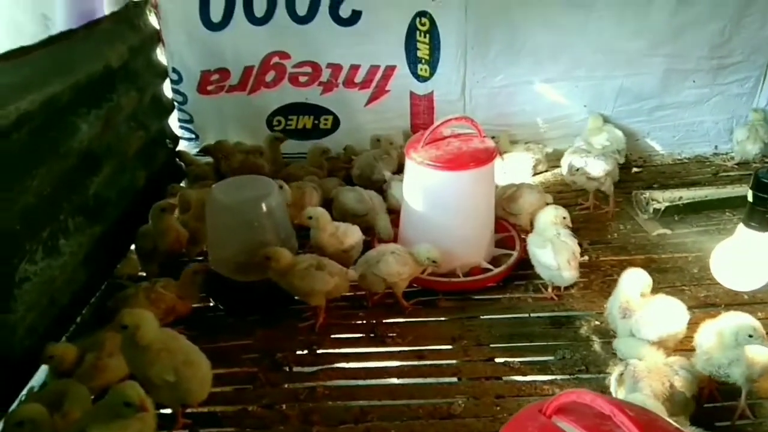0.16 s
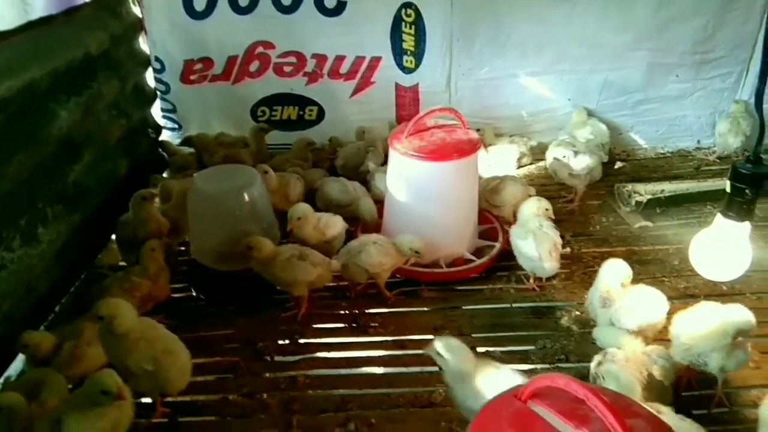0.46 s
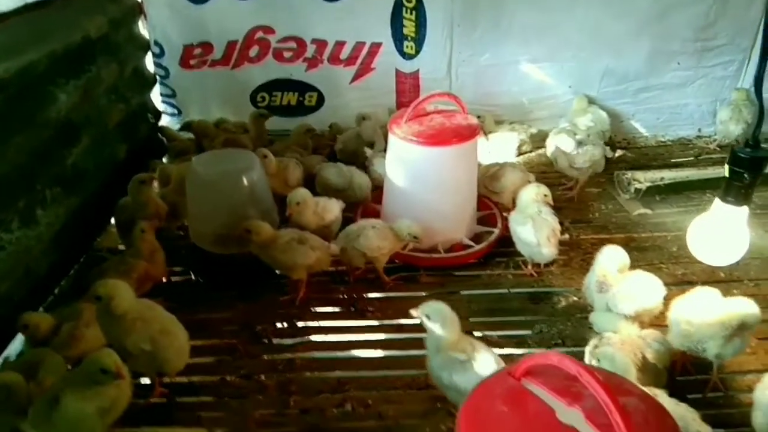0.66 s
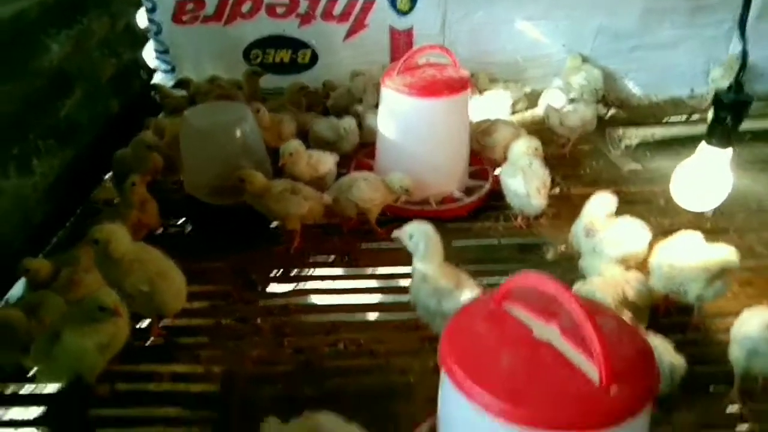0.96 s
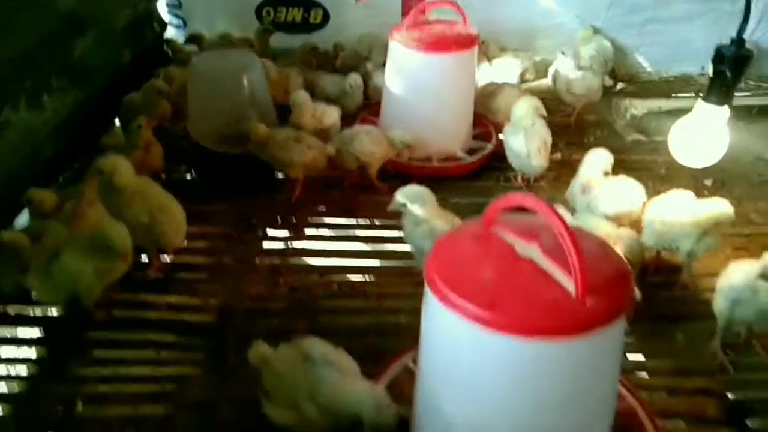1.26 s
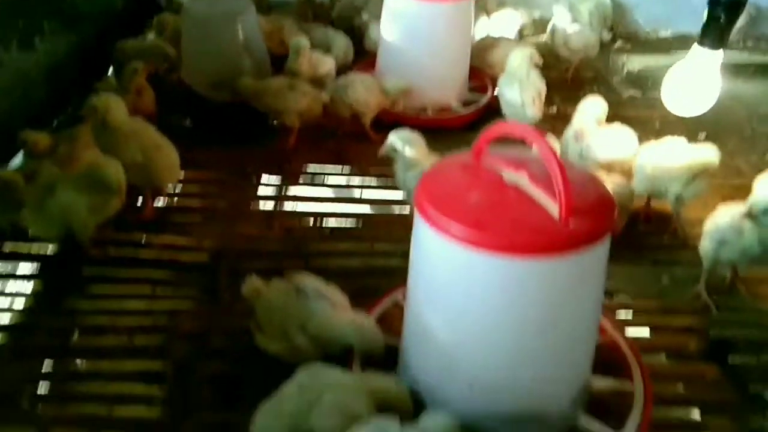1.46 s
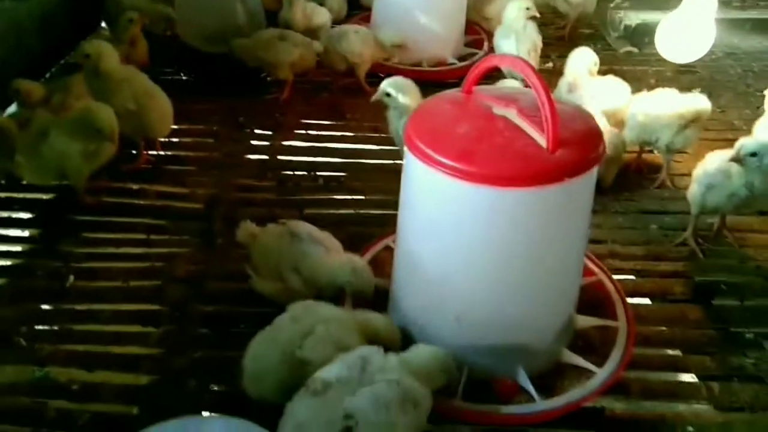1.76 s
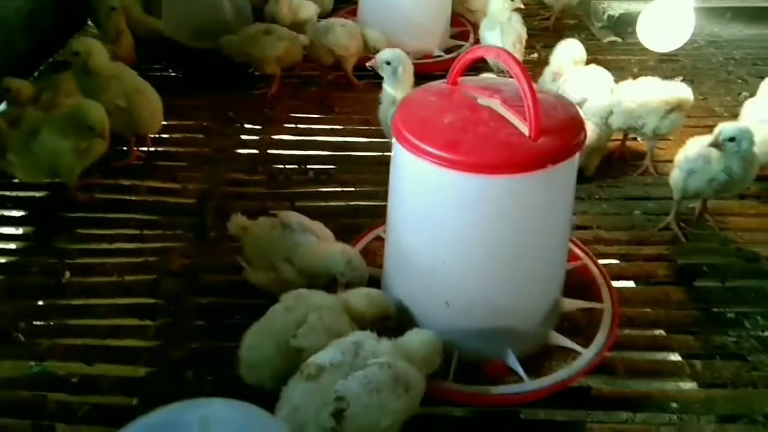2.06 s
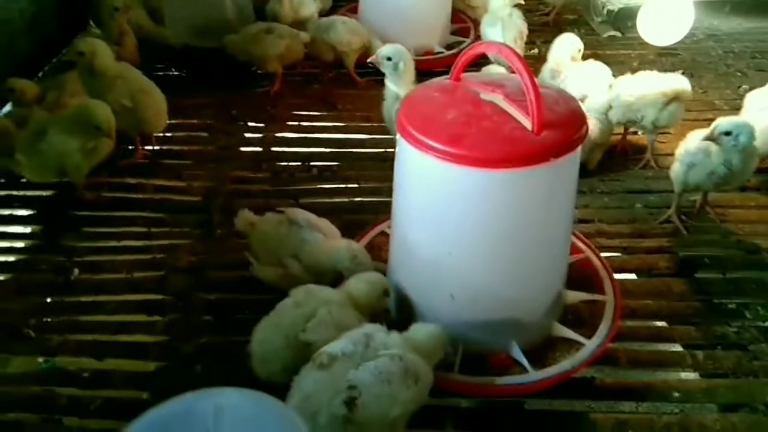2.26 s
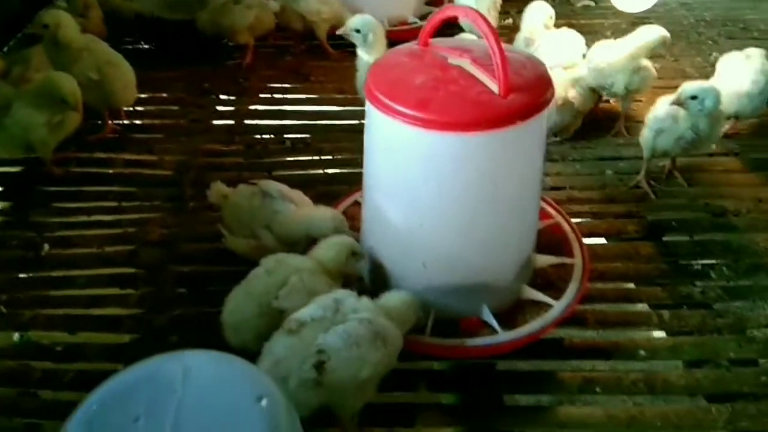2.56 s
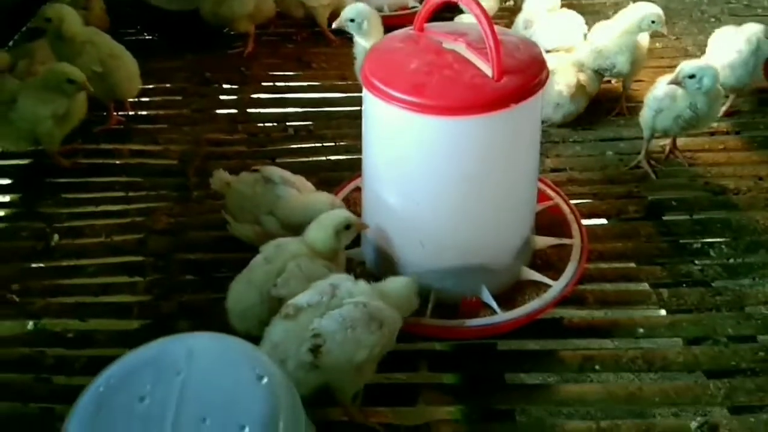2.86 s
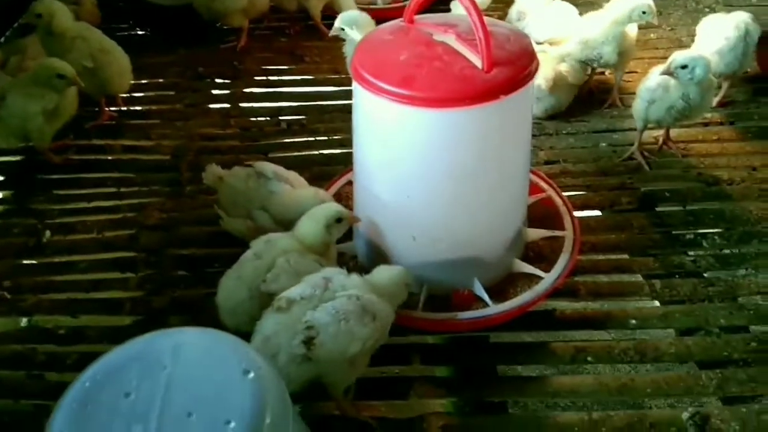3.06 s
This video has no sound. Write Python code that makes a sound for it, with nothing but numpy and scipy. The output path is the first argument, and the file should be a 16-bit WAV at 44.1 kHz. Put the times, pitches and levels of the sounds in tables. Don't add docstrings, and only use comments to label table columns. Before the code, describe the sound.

A flock of chicks chirps continuously close to a handheld microphone, with light taps on slats, tiny pecks and a low rumble. A shrill insect drone hisses steadily behind, and the whole scene fades smoothly.

```python
import sys
import numpy as np
from scipy import signal
from scipy.fft import rfft, irfft
from scipy.io import wavfile
from scipy.ndimage import uniform_filter1d

SR = 44100
rng = np.random.default_rng(int(sys.argv[2]) if len(sys.argv) > 2 else 0)


def gain_from_db(level_db):
    decades = np.asarray(level_db, float) / 20
    return 10 ** decades


def wrap_up_sound(samples):
    columns = np.atleast_2d(samples).T
    tamed = np.clip(columns, -1, 1)
    steps = np.round(tamed * 32767).astype(np.int16)
    wavfile.write(sys.argv[1], SR, steps)


N = 141120
T = np.arange(N) / SR


def table(rows, x, log=False):
    a = np.array(rows, float)
    if log:
        return np.interp(np.log(x), np.log(a[:, 0]), a[:, 1])
    return np.interp(x, a[:, 0], a[:, 1])


def level(x, db):
    return x * gain_from_db(db) / np.sqrt(np.mean(x ** 2))


def walk(rate):
    k = int(SR / rate)
    stairs = np.repeat(rng.standard_normal(N // k + 1), k)
    smooth = uniform_filter1d(uniform_filter1d(stairs, k), k)
    return level(smooth[:N], 0)


def coloured(rows):
    hz = np.arange(1, N // 2 + 2) * SR / N
    return irfft(rfft(rng.standard_normal(N)) * gain_from_db(table(rows, hz, True)), N)


def band(x, hz, width_hz):
    return signal.lfilter(*signal.iirpeak(hz, hz / width_hz, fs=SR), x)


def fade_db(t):
    # [t/s, level/dB]
    fade = [(0, 0.44), (.5, -0.25), (1.5, -6), (2.0, -9.5), (2.9, -19), (3.2, -23)]
    return table(fade, t)


def yard():
    # [f/Hz, level per Hz/dB]
    rumble = [(38, -20), (60, 3), (214, 1), (716, -8.5), (2000, -25), (4000, -39)]
    # [f/Hz, level per Hz/dB]
    air_rows = [(2000, -10), (4500, -9.5), (12000, -28), (15000, -27.5)]
    # [f/Hz, width/Hz, level/dB]
    hum_rows = [
        (118, 50, -68),
        (220, 16, -65),
    ]
    # [t/s, level/dB]
    bustle = [(0, 1), (.5, -1), (1.2, 1), (1.6, -3.5), (2.1, 0.5), (2.7, 4), (3.2, 10.5)]
    low = level(coloured(rumble) * gain_from_db(1.54 * walk(4.93) + table(bustle, T)), -58)
    hum = 0
    for hz, width, db in hum_rows:
        hum = hum + level(band(rng.standard_normal(N), hz, width), db) * gain_from_db(0.63 * walk(4.37))
    air = level(coloured([(1000, -12.5)] + air_rows) * gain_from_db(2.2 * walk(4.55)), -55.5)
    flock_hz, flock_width_hz = 3150, 610
    flock = band(rng.standard_normal(N), flock_hz, flock_width_hz)
    flock = band(flock, flock_hz, flock_width_hz)
    return low + hum + air + level(flock * gain_from_db(2 * walk(9.3)), -63)


def cicada(rate):
    drum = {13: -20, 14: -15, 15: 0, 16: -10, 17: -4, 18: -14, 19: -15, 20: -22, 21: -27}
    phase = 2 * np.pi * (np.cumsum(rate) / SR + rng.random())
    return level(sum(gain_from_db(db) * np.sin(k * phase) for k, db in drum.items()), 0)


def chorus():
    # [start f/Hz, end f/Hz]
    rates = [(455.1, 455.1), (435.4, 440.4), (464.3, 461.6), (473.8, 474.8), (426.3, 433.9)]
    # [start level/dB, end level/dB]
    levels = [
        (-43, -42),
        (-47.5, -29.5),
        (-32, -54),
        (-50, -49),
        (-48.5, -42.5),
    ]
    # [f/Hz, level per Hz/dB]
    hiss_rows = [(4600, -40.5), (5350, -22), (5600, -15.5), (6280, -12.5), (6420, 0), (7700, -5.5),
                 (9400, -20.5), (12000, -42.5)]
    u = T / T[-1]
    near = 0
    for (rate0, rate1), (db0, db1) in zip(rates, levels):
        rate = (rate0 + (rate1 - rate0) * u ** 2) * (1 + 0.0006 * walk(25.34))
        near = near + cicada(rate) * gain_from_db(db0 + (db1 - db0) * u + 3 * walk(7.62))
    swarm_hz = np.r_[rng.normal(456, 5, size=8), rng.normal(434, 4, size=5), rng.uniform(462, 480, size=5)]
    swarm = 0
    for hz in swarm_hz:
        wobble = 0.0015 * (walk(40) + 2 * walk(1))
        swarm = swarm + cicada(hz * (1 + wobble)) * gain_from_db(4 * walk(2.5))
    hiss = level(coloured(hiss_rows), -35.5) * gain_from_db(-3 * u ** 2)
    return near + level(swarm, -33) + hiss


def bumps():
    # [t/s, length/s, f/Hz, level/dB]
    rows = [
        (0.844, 0.1, 120, -54),
        (2.562, 0.035, 233, -44),
        (2.601, 0.023, 220, -45),
        (2.788, 0.071, 153, -50.5),
    ]
    out = np.zeros(N)
    for start, length, hz, db in rows:
        swell = np.exp(-(2 * (T - start) / length - 1) ** 2 * 2)
        out += level(band(rng.standard_normal(N), hz, 23.0), db) * swell
    return out


def steps():
    # [t/s, peak level/dB, f/Hz]
    rows = [(0.07, -42, 348), (0.098, -47, 380), (0.136, -48, 600), (0.415, -39.5, 400), (0.776, -46, 506),
            (0.833, -45.5, 764), (1.131, -45, 606), (1.331, -50.5, 900), (1.621, -52, 665),
            (1.686, -55, 490), (1.808, -52, 484), (1.968, -55, 497), (2.022, -57.5, 710), (2.237, -54, 515),
            (2.293, -55.5, 516), (2.35, -59.5, 540), (2.464, -58.5, 650), (2.664, -65, 890),
            (2.71, -62.5, 594), (2.955, -68, 604), (3.125, -57.5, 650)]
    t60_s, scuff_db, step_db = 0.12, -3.5, -4.5
    out, t = np.zeros(N + SR), T[:SR // 4]
    for start, db, hz in rows:
        noise = rng.standard_normal(len(t))
        slat = level(band(noise, hz, 184.0), 0)
        scuff = gain_from_db(scuff_db) * level(band(noise, 490.0, 2400.0), 0)
        env = np.minimum(t / 0.0017, 1) * gain_from_db(db + step_db - fade_db(start) - 60 * t / t60_s)
        i = int(start * SR)
        out[i:i + len(t)] += (slat + scuff) * env
    return out[:N]


def pecks():
    # [t/s, peak level/dB]
    rows = [
        (0.834, -60),
        (1.0093, -57.5),
        (1.7475, -65.5),
        (1.8288, -57),
        (2, -59),
        (2.0857, -61.5),
        (2.5192, -61.5),
    ]
    t60_s, peck_db = 0.081, 9.5
    out, t = np.zeros(N + SR), T[:SR // 4]
    bright = signal.butter(2, [1100, 5500], "band", fs=SR)
    for start, db in rows:
        tick = level(signal.lfilter(*bright, rng.standard_normal(len(t))), 0)
        i = int(start * SR)
        out[i:i + len(t)] += tick * gain_from_db(db + peck_db - fade_db(start) - 60 * t / t60_s)
    return out[:N]


def whistles(rows, bend, flutter, waver):
    lead_s, attack_s, release_s = 0.013, 0.023, 0.012
    scoop, waver_hz, overtone_db, whistle_db = 5.85, 24, -24, 1.5
    throat_hz, throat_db_per_oct = 3500, -24.5
    out = np.zeros(N)
    for k, (start, length, hz0, hz1, db) in enumerate(rows):
        t = T - start
        on = (t > -lead_s) & (t < length + lead_s / 2)
        t = t[on]
        own = (np.flatnonzero(on) + 9973 * k + int(20000 * bend)) % N
        glide = np.clip(t / length, 0, None) ** bend
        lead_in = scoop * (bend - 1) * np.clip(-t / length, 0, None) ** 2
        hz = hz0 + (hz1 - hz0) * (glide + lead_in) + waver_hz * waver[own]
        phase = 2 * np.pi * np.cumsum(hz) / SR
        rise, fall = (t + lead_s) / attack_s, (length + lead_s / 2 - t) / release_s
        env = np.sin(np.clip(np.minimum(rise, fall), 0, 1) * np.pi / 2) ** 2
        throat_db = throat_db_per_oct * np.clip(np.log2(hz / throat_hz), 0, None)
        env = env * gain_from_db(db + whistle_db + throat_db) * flutter[own]
        out[on] += env * np.sqrt(2) * (np.sin(phase) + gain_from_db(overtone_db) * np.sin(2 * phase))
    return out


def hoots(flutter, waver):
    first_s, gap_s, length_s, hz, db = 3, 0.135, 0.04, 650, -60.5
    rows = [(first_s + k * gap_s, length_s, hz, hz, db) for k in range(5)]
    return whistles(rows, 1.0, flutter, waver)


def chicks(flutter, waver):
    # [t/s, length/s, start f/Hz, end f/Hz, level/dB]
    arches = [(0.096, 0.067, 3298, 2739, -42.5), (0.339, 0.042, 3570, 2590, -38),
              (0.588, 0.053, 3790, 2680, -41.5), (0.605, 0.02, 2620, 2458, -35),
              (0.858, 0.042, 3593, 2960, -46), (0.874, 0.025, 2864, 2497, -42.5),
              (0.944, 0.056, 3353, 3165, -43), (1.392, 0.051, 3860, 3210, -44),
              (1.413, 0.026, 4600, 3400, -42.5), (1.445, 0.044, 3590, 2650, -44),
              (1.564, 0.052, 3820, 3270, -45), (1.687, 0.037, 3130, 2550, -45),
              (2.075, 0.077, 3430, 2928, -39.5), (2.08, 0.036, 3210, 2590, -43),
              (2.158, 0.016, 2645, 2315, -39.5), (2.285, 0.038, 4820, 3491, -44),
              (2.335, 0.042, 3130, 2446, -32.5), (2.41, 0.059, 3860, 3104, -39.5),
              (2.603, 0.068, 3854, 3086, -40), (2.738, 0.045, 3430, 2630, -38.5),
              (2.771, 0.079, 3880, 2670, -37.5), (2.846, 0.0285, 3625, 3260, -33),
              (2.975, 0.041, 3766, 2790, -35), (2.94, .045, 3310, 2477, -34), (.56, .04, 3500, 3130, -49),
              (2.995, 0.041, 3640, 2590, -31.5), (3.133, 0.043, 3870, 2640, -35.5)]
    # [t/s, length/s, start f/Hz, end f/Hz, level/dB]
    slides = [(0.19, 0.016, 4170, 3450, -45), (0.194, 0.034, 3250, 2673, -41),
              (0.207, 0.05, 2770, 2627, -32.5), (0.397, 0.032, 3950, 3650, -50),
              (0.417, 0.035, 4050, 3207, -36), (.425, 0.042, 3850, 3050, -41),
              (0.455, 0.025, 3189, 2180, -38.5), (0.524, 0.03, 3420, 2850, -32.5),
              (0.718, 0.056, 3510, 2550, -51.0), (0.997, 0.094, 2970, 2698, -33.5),
              (1.082, 0.021, 3770, 2970, -38.5), (1.205, 0.044, 4430, 3240, -43.5),
              (1.243, 0.051, 3330, 2853, -50.5), (1.799, 0.049, 3000, 2673, -41.5),
              (1.937, 0.03, 2712, 2500, -48.5), (2.024, 0.052, 4550, 3530, -40),
              (2.285, 0.022, 3000, 2620, -45), (2.319, 0.0258, 3579, 3030, -35.5),
              (2.662, 0.032, 3367, 3150, -33.5), (2.692, 0.019, 3096, 2520, -35.5),
              (2.712, 0.053, 3120, 2880, -35), (2.803, 0.027, 2728, 2224, -33),
              (2.865, 0.031, 3215, 2513, -31), (2.745, 0.029, 2764, 2410, -42),
              (2.948, 0.045, 4040, 2790, -35), (3.122, 0.042, 3255, 2450, -34)]
    # [t/s, length/s, start f/Hz, end f/Hz, level/dB]
    held = [(0, 0.01, 2400, 2300, -42), (.005, 0.033, 2800, 2820, -52.5), (0.157, 0.067, 2800, 2735, -35),
            (.212, 0.048, 3460, 2880, -39), (0.322, 0.051, 1800, 1380, -54.5),
            (0.475, 0.045, 2985, 3025, -38.5), (.555, 0.052, 2840, 2697, -36),
            (0.635, 0.03, 930, 952, -56.5), (0.838, 0.027, 2902, 2840, -35.5),
            (1.085, 0.034, 2654, 2490, -43), (1.497, 0.048, 2363, 2430, -52),
            (1.966, 0.035, 2500, 3290, -42), (2.06, 0.049, 2460, 2500, -50),
            (2.131, 0.028, 2625, 2750, -41), (2.242, 0.09, 3092, 2937, -43),
            (2.368, 0.012, 2515, 2230, -42), (2.325, 0.039, 2380, 2650, -42),
            (2.524, 0.042, 2188, 2222, -44.5), (2.555, 0.049, 3337, 3310, -49),
            (2.712, 0.041, 2497, 2530, -43), (2.775, 0.029, 2690, 2490, -35.5),
            (3.04, 0.038, 3456, 3210, -34), (3.09, 0.043, 3100, 2936, -32.5)]
    # [t/s, length/s, start f/Hz, end f/Hz, level/dB]
    more_peeps = [(0.076, 0.028, 3064, 3255, -48.5), (0.086, 0.078, 3580, 3310, -55.5),
                  (.228, 0.022, 2480, 2260, -44), (0.273, .035, 2543, 2730, -55), (.39, .012, 4800, 4550, -58),
                  (0.438, .03, 3900, 3440, -44), (.47, 0.035, 3450, 3460, -54), (.552, .03, 3570, 4150, -50),
                  (0.641, 0.0094, 2520, 2400, -47), (0.903, 0.079, 4620, 4630, -55),
                  (1.065, .01, 3970, 3850, -57), (1.268, 0.0091, 3600, 3550, -55),
                  (1.542, 0.015, 2490, 3550, -46.5), (1.56, .008, 2850, 2700, -47),
                  (1.683, .022, 3700, 3160, -56), (1.807, 0.022, 4080, 4040, -52),
                  (1.857, 0.023, 2762, 2740, -59), (2.023, 0.028, 3350, 3220, -50),
                  (2.155, 0.063, 3520, 3340, -52.5), (2.38, 0.022, 3350, 3430, -48),
                  (2.828, .02, 3980, 3850, -51), (2.912, 0.021, 3000, 4000, -51), (2.925, .025, 4420, 4250, -52),
                  (2.928, 0.091, 2720, 2290, -50)]
    falling = whistles(arches, 1.6, flutter, waver)
    dropping = whistles(slides, 0.65, flutter, waver)
    return falling + dropping + whistles(held + more_peeps, 1.0, flutter, waver)


def pen_echo(near):
    t60_s, echo_db, shuffle_hz = 0.2, -3.5, 30
    t = T[:SR // 2]
    echo = rng.standard_normal(len(t)) * gain_from_db(-60 * t / t60_s) * np.minimum(t / 0.0029, 1)
    echo = echo * gain_from_db(echo_db) / np.sqrt(np.sum(echo ** 2))
    shuffled = near * np.sqrt(2) * np.sin(2 * walk(shuffle_hz))
    return signal.fftconvolve(shuffled, echo)[:N]


def scene():
    flutter = gain_from_db(2.6 * walk(45)) * (1 + 0.36 * walk(450))
    waver = walk(90)
    near = steps() + pecks() + hoots(flutter, waver) + chicks(flutter, waver)
    mix = yard() + chorus() + bumps() + near + pen_echo(near)
    return (mix * gain_from_db(fade_db(T)))[None]


def top_cut(x):
    return signal.sosfilt(signal.butter(12, 15870, fs=SR, output="sos"), x)


def record(dry):
    low_pass = signal.ellip(8, 0.2, 70, 15600, fs=SR, output="sos")
    return top_cut(signal.sosfilt(low_pass, dry))


dry = scene()
out = record(dry)
wrap_up_sound(out)
```